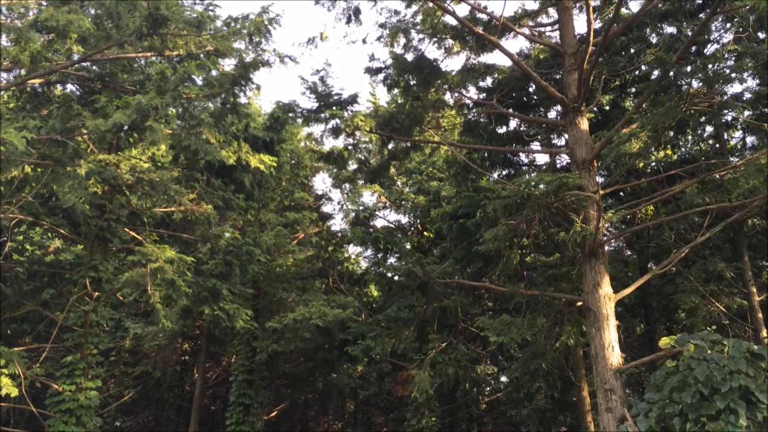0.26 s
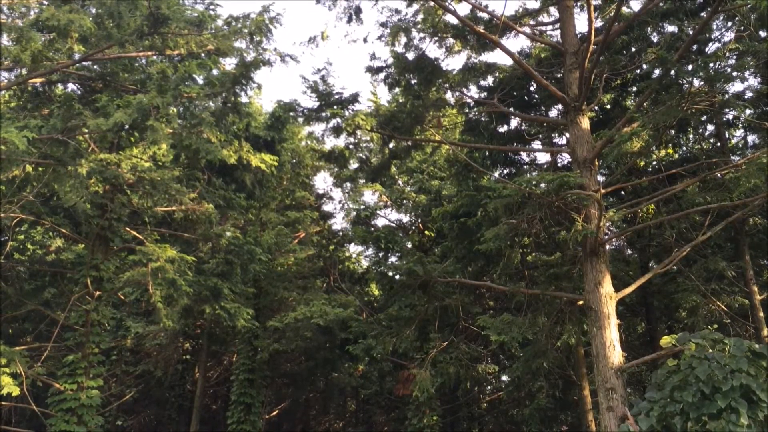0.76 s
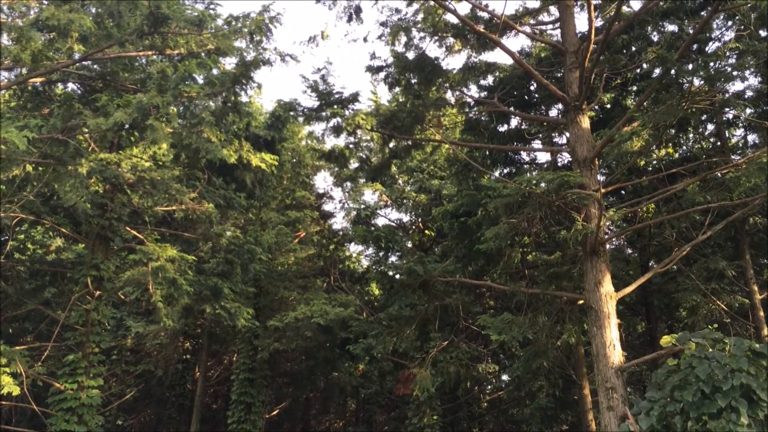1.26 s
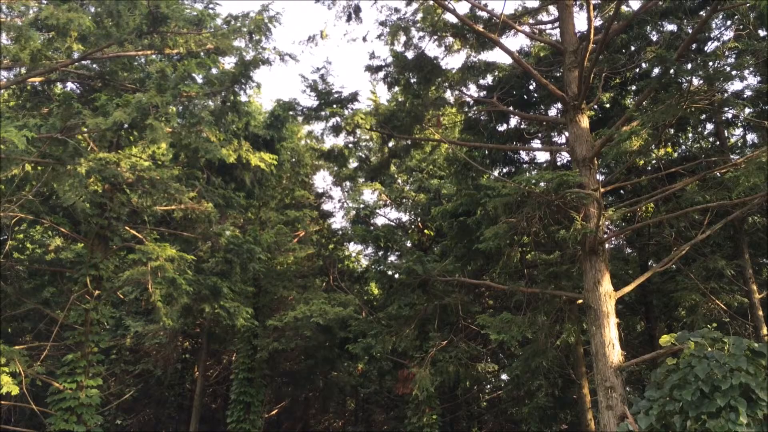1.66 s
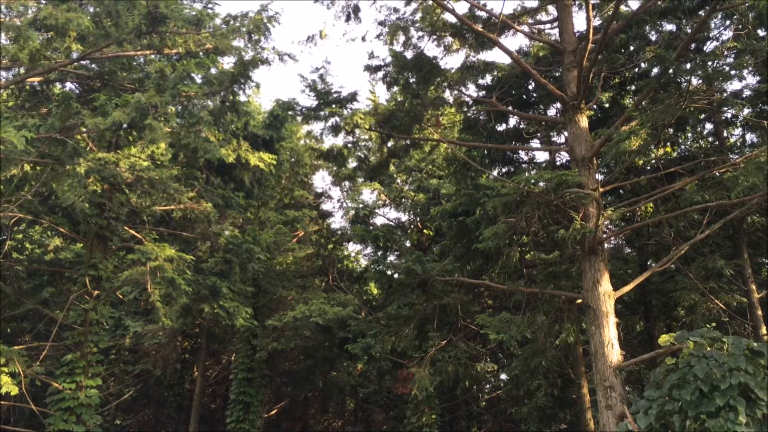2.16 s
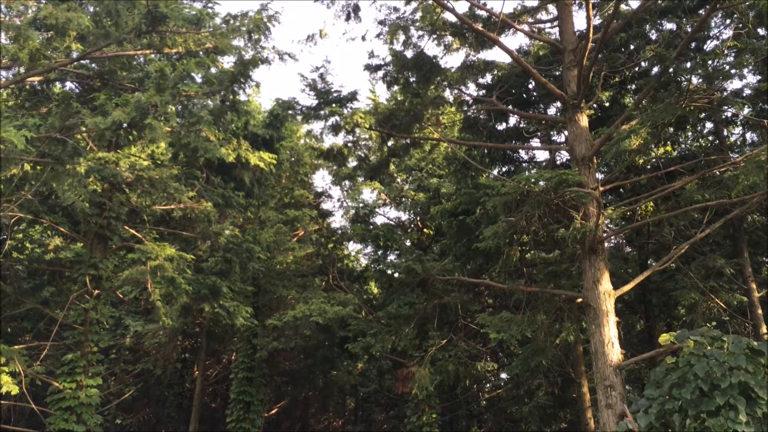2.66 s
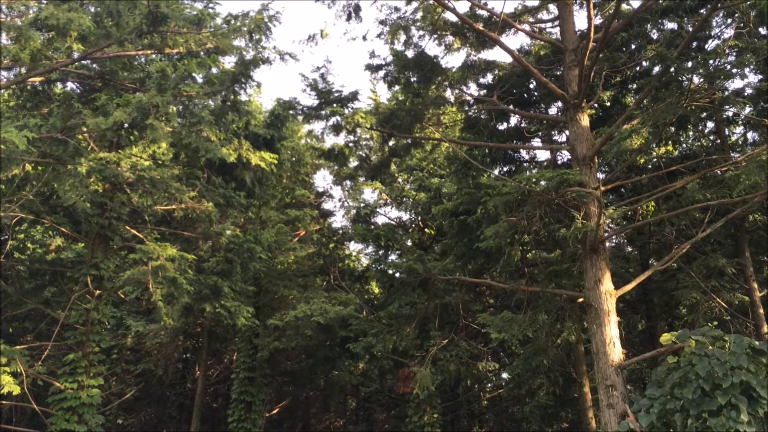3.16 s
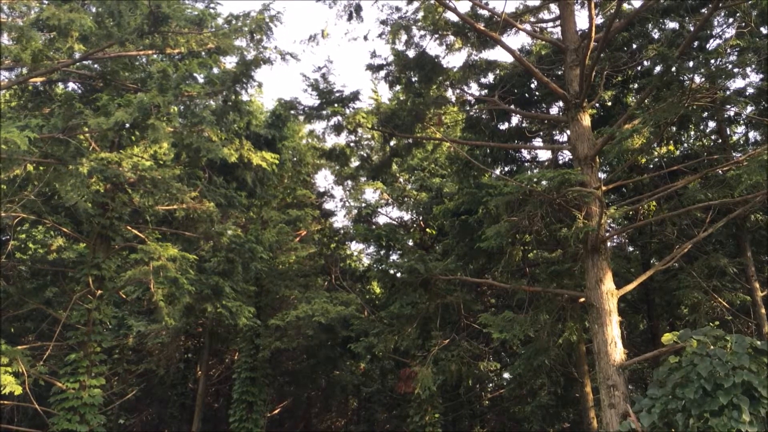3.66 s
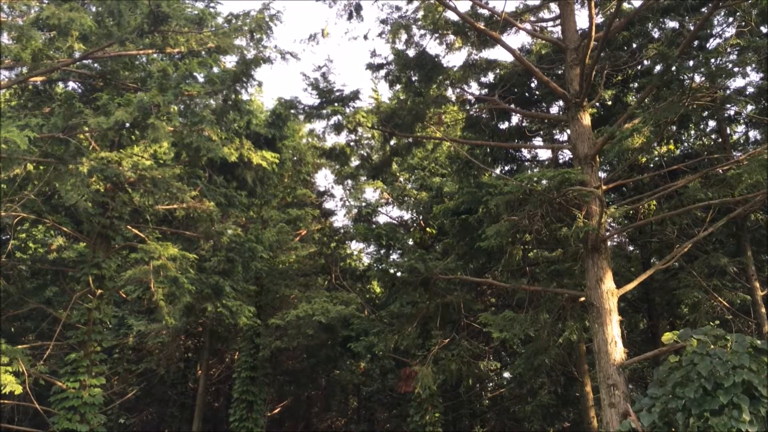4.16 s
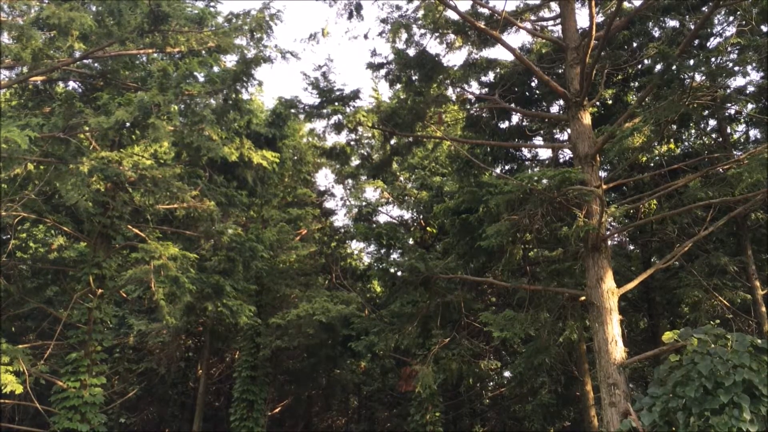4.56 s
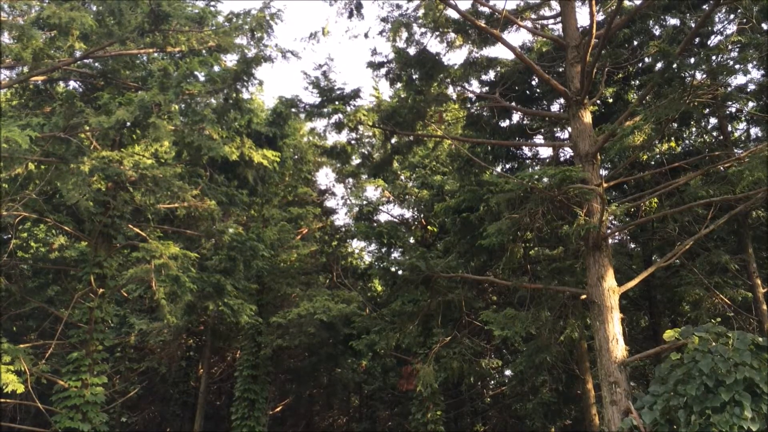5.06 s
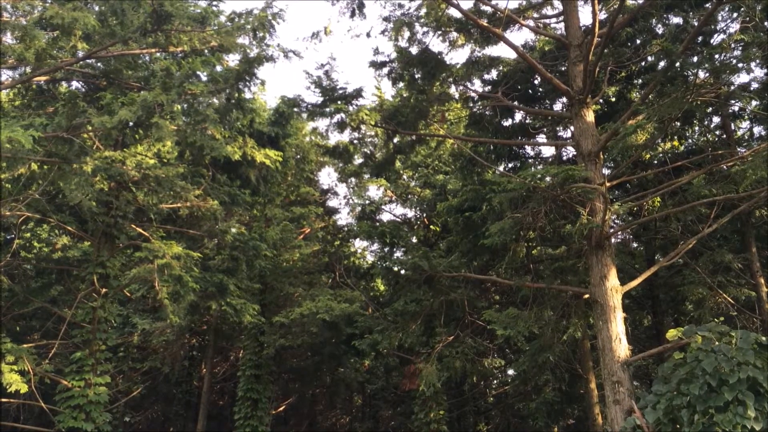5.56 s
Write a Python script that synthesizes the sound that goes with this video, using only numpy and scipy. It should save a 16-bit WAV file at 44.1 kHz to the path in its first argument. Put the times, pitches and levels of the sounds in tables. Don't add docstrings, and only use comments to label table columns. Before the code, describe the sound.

Woodland at dusk, heard through a phone in mono: cicadas repeat clear, metallic, whistling notes with a buzzing edge, first sparse, then dense and strong, thinning around the middle before fresh short phrases overlap at the end. Far cicadas form a wavering shimmer that rises and falls. Trees add diffuse echo. A faint cricket whistles in the first half, one soft twig knock comes early, and distant traffic hums quietly.

```python
import sys
import numpy as np
from scipy import signal
from scipy.fft import rfft, irfft
from scipy.io import wavfile
from scipy.ndimage import uniform_filter1d

SR = 44100
rng = np.random.default_rng(int(sys.argv[2]) if len(sys.argv) > 2 else 0)


def to_wav(s):
    ch = np.atleast_2d(s).T
    pcm = np.round(np.clip(ch, -1, 1) * 32767)
    wavfile.write(sys.argv[1], SR, pcm.astype(np.int16))


def gain_from_decibels(decibels):
    exponent = np.asarray(decibels, float) / 20
    return 10 ** exponent


N = 255780
TIME_S = np.arange(N) / SR

# syllable/s, fundamental/dB, echo/dB, roughness/0-1
VOICES = [(0.0436, -18, -6, 0.21), (0.057, -9.5, -2.5, 0.2), (0.072, -8.5, -4.5, 0.61),
          (0.0399, -10.5, 0.5, 0.31), (0.041, -8.5, -1.5, 0), (0.0383, -7.5, 3, 0.25),
          (0.041, -7.5, -10, 0.14), (0.0532, -1.5, -8.5, 0.19), (0.0556, -16, -2, 0.06),
          (0.0554, -4, -16, 0.34)]
# first syllable/s, fresh gap/s, tiring/s; gap = fresh + tiring / syllables of strength left
RHYTHM_S = [
    (.067, .1006, .0468),
    (.667, .0881, .1684),
    (1.304, .0296, 1.9073),
    (1.595, .07, .3411),
    (2.952, .1202, .0258),
    (3.865, .1143, .0138),
    (4.658, .103, 0),
    (4.567, .0669, .3619),
    (5.073, .1026, .0216),
    (5.085, .0784, .1863),
]
COUNTS = [(5, 3), (20, 1), (18, 13.9), (11, 3), (6, .7), (6, .3), (4, 3), (10, 3), (7, .7), (6, 1.9)]
# octave/dB, soft start/dB, fading/(dB/s^2), brightness/dB, its fading/(dB/s)
EFFORT = [(-50.5, -1, -4, -57.5, 1), (-38, 5, 2.5, -52.5, 1.3), (-38, 9, 3, -59, 2.5),
          (-45, 16, 5, -56, 0.5), (-46.5, -2, 12, -55, -1), (-46.5, 7, 8, -66.5, .1),
          (-42.5, 7, -3, -54, 2), (-43.5, 4, 5, -53, -1), (-38.5, 7.5, 17, -50.5, -1),
          (-45.5, -1.2, 5, -55, 15)]
# f/Hz, lower start/Hz, overshoot/Hz, sag/(Hz/s)
TUNES_HZ = [(2216, 0, 0, 0), (2336, 27, 41, 21), (2142, 90, 0, 46), (2234, 0, 0, 13), (2216, 0, 0, 12),
            (2134, 0, 0, -70), (2186, 0, 0, -62), (2082, 70, 0, 52), (2265, 44, 8, 55), (2157, 0, 0, 24)]
CLIMB_S, WARMUP_S, UNEVEN_DB = .09, 0.08, 0.83
BRIGHT_LAG = 1.6
PITCH_ARCH = .004

UPPER_DB = [2.5, 1.5, -10, -23]
LEAD_S = [0.0053, -0.0043, 0.016, 0.0096, 0.011, 0.014, 0.011]
STRETCH = [0.89, 0.97, 0.78, 0.71, 0.96, 0.72, 1.3]
BELOW_DB = [-20, -10, -11, -1, 1, 1.5]
ABOVE_DB = [-28, -27, -16, -16, -14, -12]
RAGGED = [.9, .8, 2.2, 1.8, 4.2, 4.2]
CYCLES_PER_PULL = 7
# f/Hz, density/(dB/Hz)
RASP = [(1400, -27.5), (1900, 6), (2500, -0.5), (3200, -14.5), (3800, 1), (5200, -0.5), (7000, -2.5),
        (8800, -5), (9800, -20), (11000, -11.5), (12000, -29), (13200, -19), (14300, -28), (15500, -19)]
NEAR_RASP_DB, CROWD_RASP_DB = -9, -7.5
UNDERTONE_DB, UNDERTONE_S = -21.5, 0.03
WOOD_T60_S, WOOD_DAMP = .7, .25
ECHO_STEP_DB = 1.3

# t/s, octave level/dB
CROWD_SWELL = [(0, -44), (.4, -44), (.9, -40.5), (1.35, -40), (1.6, -38.5), (2.2, -39.5), (2.7, -41),
               (3.2, -46), (3.7, -44), (4.0, -42.5), (4.45, -41), (5.2, -39.5), (5.5, -40), (5.8, -40.5)]
CROWD_DB = [-1, -2, -6.5, -7, -6, -20.5]
# rest level re octave/dB, share of swell not followed/ratio
CROWD_TONE = [(-5.5, 0.43), (-5, 0.45), (-17.5, 1)]
CROWD_HZ, CROWD_SPREAD_HZ, CROWD_REST_DB = 2135, 135, -42

# f/Hz, density/(dB/Hz)
AIR = [(20, -35), (50, -9), (80, -0.5), (120, -5), (170, -9), (260, -11.5), (480, -17.5), (900, -20),
       (1600, -20), (4000, -27.5), (9000, -40), (15000, -44)]
AIR_DB = -57.93
# f/Hz, width/Hz, level/dB
HUM = [(93.5, 3.7, -68), (188.6, 1.04, -72.5), (213.9, 9.3, -64.5), (367, 3.2, -73.5), (437, 5.6, -84.5),
       (544, 1.3, -79.5)]
# start/s, end/s, f/Hz, level/dB
CRICKET = [
    (.2, 0.34, 7700, -59),
    (.62, 0.911, 7600, -57.5),
    (.96, 1.22, 7640, -65),
    (2.47, 2.65, 7550, -57),
    (3.0, 3.554, 7500, -60),
]
# t/s, peak/dB, f/Hz
TICK = [
    (0.618, -42, 645),
]

# start/s, end/s, loss/dB
DROPS = [(0.166, 0.203, 4), (0.452, 0.489, 22), (1.983, 2.007, 21), (2.35, 2.37, 16), (2.668, 2.692, 21),
         (3.01, 3.03, 13), (3.05, 3.075, 11), (3.782, 3.794, 28), (3.92, 3.946, 7), (3.973, 4.029, 28),
         (4.21, 4.227, 23)]
# low f/Hz, high f/Hz
QUIET_HZ = [(420, 1750), (2500, 3770), (4950, 5670), (7200, 7560), (9300, 10300), (11300, 16000)]
# f/Hz, level re neighbours/dB
MASK = [(4700, -40), (4900, -17), (5300, -20), (7000, -20), (7400, -14), (9200, -15), (9800, -12),
        (11000, -11), (12200, -6.5), (13200, -4), (14300, -3), (15280, -1), (15330, 40)]


def level(x, db):
    return x * gain_from_decibels(db) / np.sqrt(np.mean(x ** 2))


def walk(rate_hz):
    hold = int(SR / rate_hz)
    steps = np.repeat(rng.standard_normal(N // hold + 1), hold)
    return 1.3 * uniform_filter1d(uniform_filter1d(steps, hold), hold)[:N]


def coloured(points):
    hz, db = np.transpose(points)
    bins_hz = np.arange(N // 2 + 1) * SR / N + 1
    gain = gain_from_decibels(np.interp(np.log(bins_hz), np.log(hz), db))
    return level(irfft(rfft(rng.standard_normal(N)) * gain, N), 0)


def scatter(partials, early=0):
    t = TIME_S[:SR]
    t60 = WOOD_T60_S / (1 + WOOD_DAMP * np.arange(len(partials)))[:, None]
    decay = np.exp(-np.log(1000) * t / t60)
    build_up = 1 - np.exp(-t / 0.0035)
    echo = rng.standard_normal((len(partials), SR)) * decay * build_up
    echo /= np.sqrt(np.sum(echo ** 2, axis=1, keepdims=True))
    return signal.fftconvolve(partials, echo, axes=1)[:, early:early + N]


def tymbal(hz, rough):
    jittered_hz = hz * (1 + 0.00602 * rough * walk(200)[:len(hz)])
    pulls = np.cumsum(jittered_hz) / SR / CYCLES_PER_PULL + rng.random()
    angle = (2 * np.pi * (pulls % 1)).astype(np.float32)
    below, above = gain_from_decibels(np.array(BELOW_DB)), gain_from_decibels(np.array(ABOVE_DB))
    ragged = rough * walk(300)[:len(hz)]
    out = np.empty((len(RAGGED), len(hz)))
    for k, uneven in enumerate(RAGGED):
        order = CYCLES_PER_PULL * (k + 1)
        tone = np.sin(order * angle)
        tone = tone + below[k] * np.sin((order - 1.062) * angle)
        tone = tone + .5 * below[k] ** 2 * np.sin((order - 1.86) * angle)
        tone = tone + above[k] * np.sin((order + 0.91) * angle)
        out[k] = (1 + uneven * ragged) * tone
    return np.sqrt(2) * out


def syllables(t, middles, length):
    nearest = np.searchsorted((middles[1:] + middles[:-1]) / 2, t)
    u = (t - middles[nearest]) / length
    return np.exp(-np.where(u < 0, (u / .4) ** 4, (u / .5) ** 2)), nearest


def crowd(count=26):
    partials, power = np.zeros((6, N)), 0
    for place, (pace, start) in zip(np.linspace(-1, 1, count), rng.standard_normal((count, 2))):
        gap_s = .115 * (1 + .1 * pace)
        middles = np.arange(-1, N / SR + 1, gap_s) + .05 * start
        gate = syllables(TIME_S, middles, .06)[0] * gain_from_decibels(2.5 * walk(1.3) - 6 * place ** 2)
        hz = CROWD_HZ + CROWD_SPREAD_HZ * place + 30 * walk(2)
        partials += gate * tymbal(hz, .45)
        power = power + gate ** 2
    layers = np.vstack([partials, coloured(RASP) * np.sqrt(power)])
    half_s = SR // 2
    led_in = np.hstack([layers[:, -half_s:], layers])
    layers = .25 * layers + scatter(led_in, early=half_s)
    layers /= np.sqrt(uniform_filter1d(layers ** 2, half_s, axis=1))
    db = np.interp(TIME_S, *np.transpose(CROWD_SWELL))
    low, mid, top = (rest_db - lag * (db - CROWD_REST_DB) for rest_db, lag in CROWD_TONE)
    tone_db = np.array([low, 0 * db, mid, mid, top, top, mid / 2])
    gains_db = db + tone_db + np.array([*CROWD_DB, CROWD_RASP_DB])[:, None]
    return (layers * gain_from_decibels(gains_db)).sum(axis=0)


def traffic():
    out = level(coloured(AIR) * gain_from_decibels(0.23 * walk(3.02)), AIR_DB)
    for hz, width, db in HUM:
        skirt = [(hz - 2 * width, -60), (hz - width / 2, -6), (hz, 0), (hz + width / 2, -6), (hz + 2 * width, -60)]
        out = out + gain_from_decibels(db) * coloured(skirt)
    return out


def phrase(k, t):
    (first, fresh, tiring), (count, left) = RHYTHM_S[k], COUNTS[k]
    n = np.arange(count)
    gaps = (n > 0) * (fresh + tiring / (count - 1 + left - n))
    s = first + np.cumsum(gaps)
    top_db, soft_db, fade, bright_db, bright_fade = EFFORT[k]
    start_db = -soft_db * np.exp(-(s - first) / WARMUP_S)
    octave_db = top_db + start_db - fade * (s - first) ** 2
    brightness_db = bright_db + BRIGHT_LAG * start_db - bright_fade * (s - first)
    hz, low_hz, over_hz, sag = TUNES_HZ[k]
    u = np.maximum(t - first, 0)
    climb_hz = (over_hz * (u / CLIMB_S) ** 2 - low_hz) * np.exp(-u / CLIMB_S)
    return s, octave_db, brightness_db, hz - sag * u + climb_hz


def near():
    direct, wet = np.zeros((2, 7, N))
    rasp = coloured(RASP)
    lead, stretch = np.array(LEAD_S)[:, None], np.array(STRETCH)[:, None]
    echo_steps = np.array([-3.5, 3.5, 2.5, -3.5, -1.5, -5.5, -3.5])
    for singer, (length, low_db, echo_db, rough) in enumerate(VOICES):
        s, db, bright, pitch = phrase(singer, TIME_S)
        db = db + UNEVEN_DB * rng.standard_normal(len(s))
        span = slice(max(int((s[0] - .1) * SR), 0), min(int((s[-1] + .1) * SR), N))
        gate, k = syllables(TIME_S[span] + lead, s, length * stretch)
        hz = pitch[span] * (1 - PITCH_ARCH * (1 - gate[1]))
        rasp_db = (db + bright) / 2 + NEAR_RASP_DB
        gains_db = np.array([db + low_db, db, *(bright + d for d in UPPER_DB), rasp_db])
        song = np.vstack([tymbal(hz, rough), rasp[span]])
        song = song * gate * np.take_along_axis(gain_from_decibels(gains_db), k, axis=1)
        direct[:, span] += song
        wet[:, span] += song * gain_from_decibels(echo_db - ECHO_STEP_DB * echo_steps)[:, None]
    return (direct + scatter(wet)).sum(axis=0)


def cricket():
    out = 0
    for start, end, hz, db in CRICKET:
        ramp = np.clip(np.minimum(TIME_S - start, end - TIME_S) / 0.021, 0, 1)
        gate = ramp * gain_from_decibels(db + 2.3 * walk(25.26))
        out = out + gate * np.sqrt(2) * np.sin(2 * np.pi * np.cumsum(hz + 14 * walk(38)) / SR)
    return out


def twig():
    out = 0
    for s, db, hz in TICK:
        burst = np.exp(-((TIME_S - s - .003) / 0.0024) ** 2)
        out = out + gain_from_decibels(db) * burst * np.sin(2 * np.pi * hz * (TIME_S - s))
    return out


def undertone(lead=1, first=slice(1, 7)):
    s, db, _, pitch = phrase(lead, TIME_S)
    gate, k = syllables(TIME_S, s[first], UNDERTONE_S)
    tone = np.sqrt(2) * np.sin(2 * np.pi * np.cumsum(4 / 3 * pitch) / SR)
    return gate * gain_from_decibels(db[first][k] + UNDERTONE_DB) * tone


def drop_quiet_bands(x):
    bins_hz = np.arange(N // 2 + 1) * SR / N
    inside = sum((bins_hz > low) & (bins_hz < high) for low, high in QUIET_HZ)
    quiet = irfft(rfft(x) * inside, N)
    lost = 0
    for start, end, db in DROPS:
        ramp = np.clip(np.minimum(TIME_S - start, end - TIME_S) / 0.012 + .5, 0, 1)
        lost = lost + (1 - gain_from_decibels(-db)) * ramp
    return x - lost * quiet


def thin(x, size=2048):
    hop = size // 4
    hz, _, z = signal.stft(x, SR, nperseg=size, noverlap=3 * size // 4)
    first = np.arange(len(hz)) // 4 * 4
    power = np.abs(z) ** 2
    near_db = 10 * np.log10(uniform_filter1d(power, size=140, axis=0)[first] + 1e-18)
    band_db = 10 * np.log10(uniform_filter1d(power, size=4, axis=0, origin=-2)[first] + 1e-18)
    wander_db = 2 * walk(7)[np.minimum(np.arange(z.shape[1]) * hop, N - 1)]
    mask_db = np.interp(hz[first], *np.transpose(MASK))[:, None]
    keep = band_db - near_db > mask_db + wander_db
    return signal.istft(z * keep, SR, nperseg=size, noverlap=3 * size // 4)[1][:N]


def scene():
    return (crowd() + traffic() + near() + cricket() + twig() + undertone())[None]


def low_pass(x):
    return signal.sosfilt(signal.butter(12, 15490, fs=SR, output="sos"), x)


def record(dry):
    mix = thin(drop_quiet_bands(dry[0]))[None]
    return low_pass(mix)


dry = scene()
out = record(dry)
to_wav(out)
```